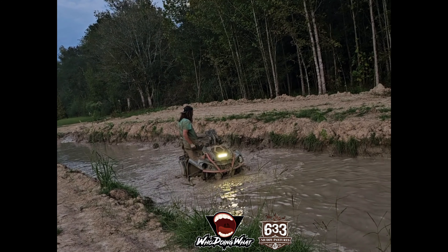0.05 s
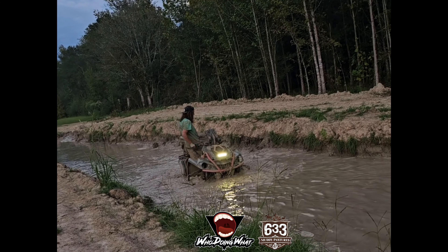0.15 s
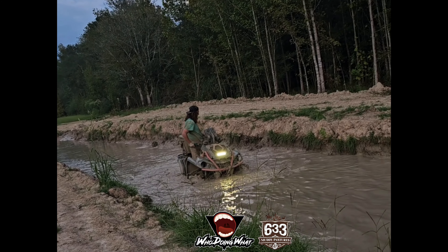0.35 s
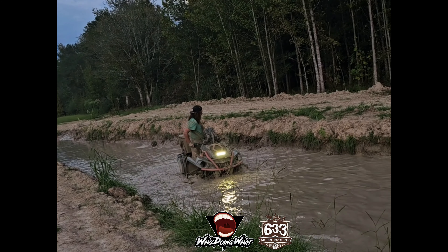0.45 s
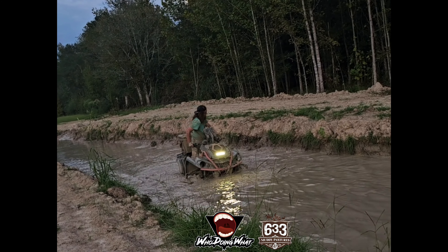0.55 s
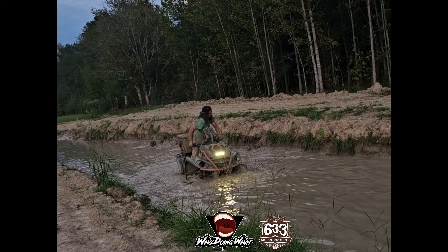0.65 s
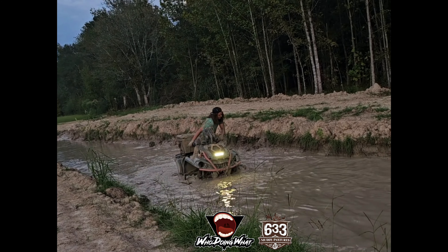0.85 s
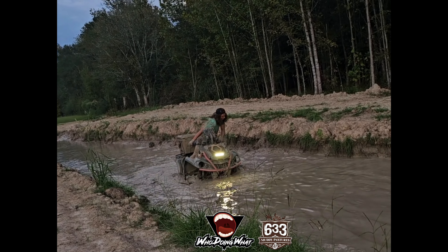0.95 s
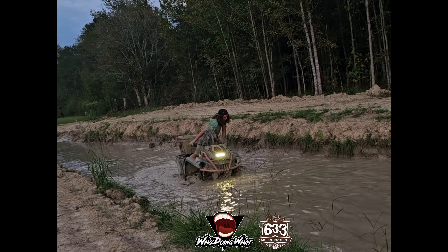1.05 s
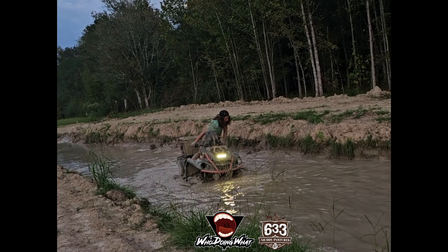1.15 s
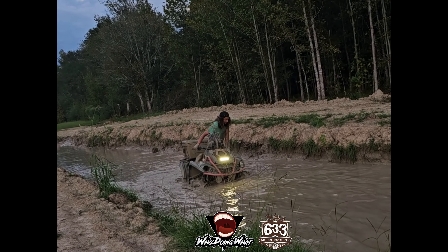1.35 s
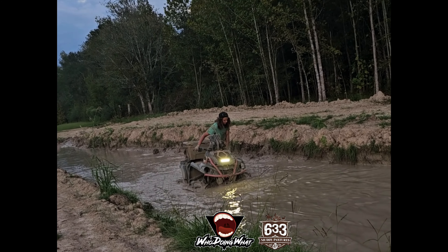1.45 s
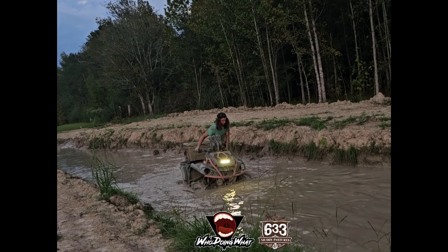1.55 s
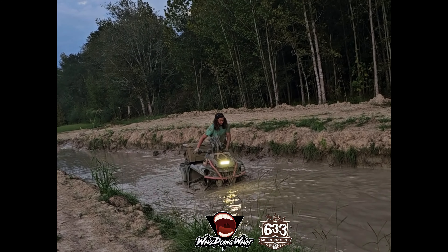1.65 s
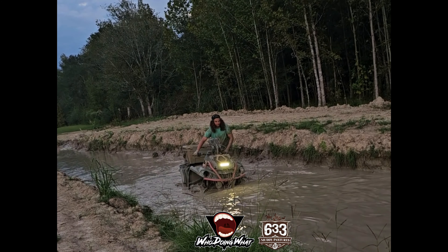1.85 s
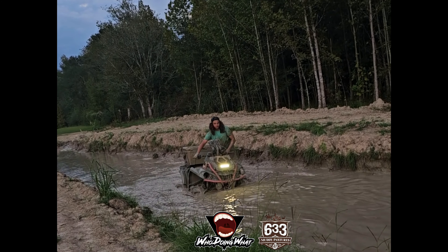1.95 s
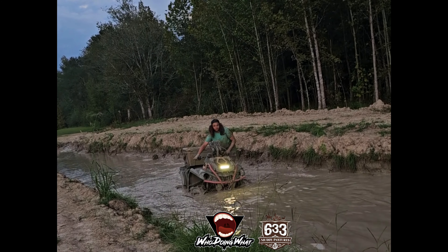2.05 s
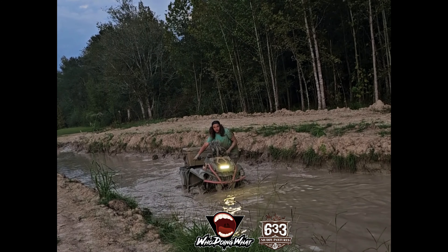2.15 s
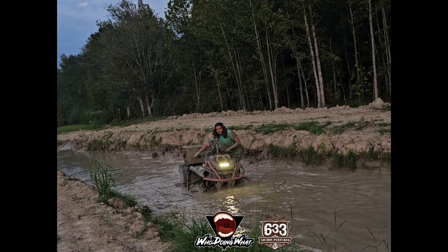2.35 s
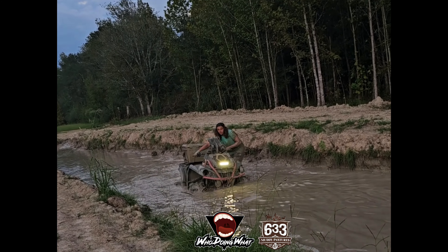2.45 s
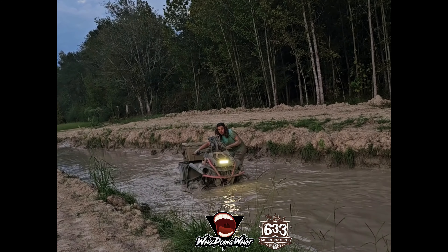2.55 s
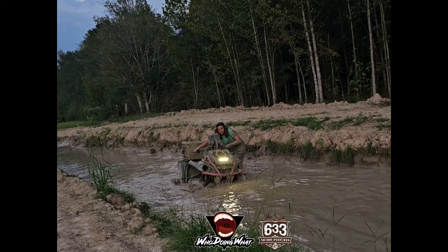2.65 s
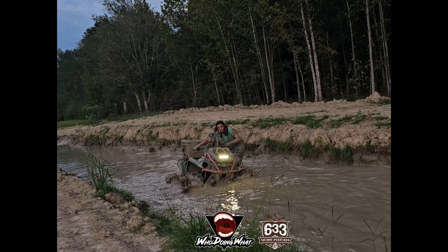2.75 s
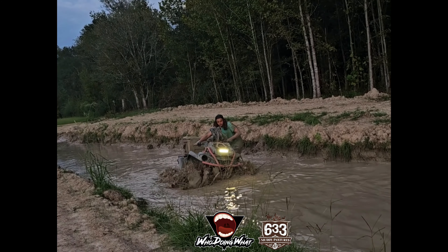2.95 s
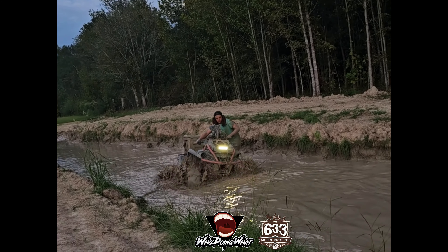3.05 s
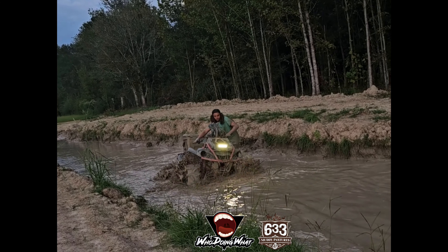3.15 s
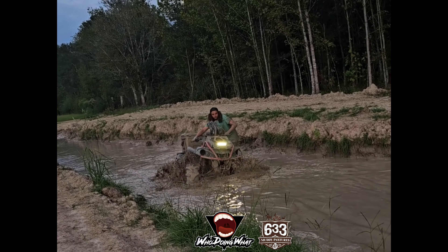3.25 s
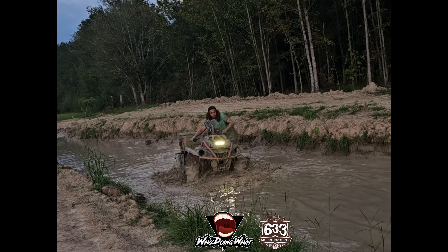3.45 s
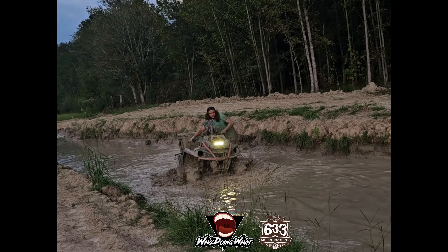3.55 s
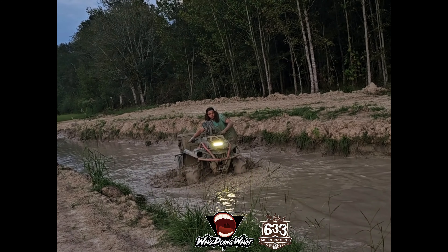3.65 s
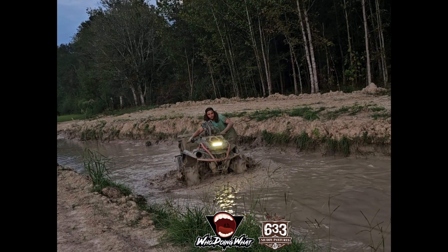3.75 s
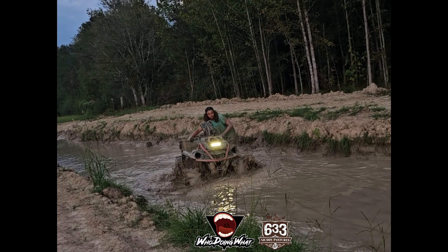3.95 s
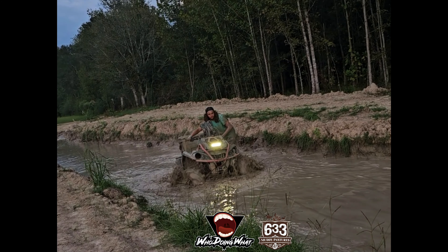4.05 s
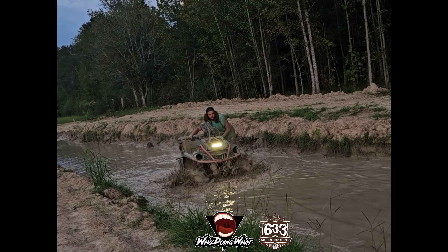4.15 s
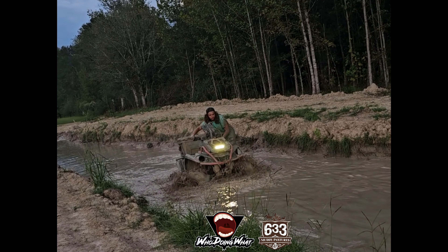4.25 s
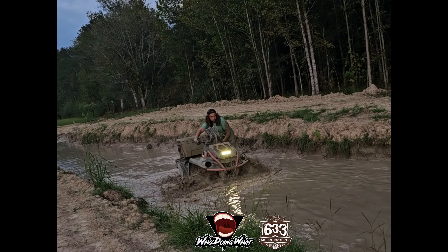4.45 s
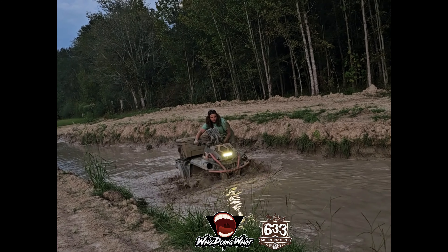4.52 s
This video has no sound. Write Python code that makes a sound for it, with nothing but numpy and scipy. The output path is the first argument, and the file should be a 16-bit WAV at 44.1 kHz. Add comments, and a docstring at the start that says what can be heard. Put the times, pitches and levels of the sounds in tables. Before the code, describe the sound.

Outdoors by a muddy pond, two small single-cylinder engines idle close to a stereo microphone, deep thumps drifting in and out of step with valve clatter. From two seconds a stuck quad on the left blips its throttle again and again, raspy and honking, its tyres throwing hissing spray and mud slaps. A distant engine drones from about four seconds.

```python
"""Two alike single-cylinder quads idle close by, drifting in and out of step, on the bank of a mud pond:
each firing rings the exhaust pipe and stirs valve clatter; a faint whirr lies on top.
Farther out a third quad is stuck in the water: its throttle is blipped, pulses and gas noise ring
its exhaust modes to a rasp, and the tyres throw spray, a gated hiss with slaps of mud.
A fourth engine drones in the distance, a gliding partial with some roar, over the rumble of far engines."""
import sys
import numpy as np
from scipy import signal
from scipy.fft import rfft, irfft
from scipy.io import wavfile
from scipy.ndimage import uniform_filter1d

SR = 44100
rng = np.random.default_rng(int(sys.argv[2]) if len(sys.argv) > 2 else 0)


def transcribe(u):
    """Save the signal u as a 16-bit wav file named by the first command-line argument.

    u: samples, shape (n,) or (channels, n), limited to [-1, 1]; the rate is SR.
    q: integer samples, one column per channel.
    """
    v = np.clip(np.atleast_2d(u).T, -1, 1)
    q = np.round(v * 32767).astype(np.int16)
    wavfile.write(sys.argv[1], SR, q)


N = 406602

# Throttle blips of the stuck quad. Each row: fully open at s, held for s, exhaust rasp in dB, spray in dB,
# pipe-mouth colour in dB, brightness in dB, honk in dB.
BLIPS = [(2.0, 0.17, -16, -38, -0.5, 2, 0.5), (2.875, .19, -14, -35, 0.5, 3.5, 1),
         (3.66, 0.22, -16, -41.5, 1, -4, -1), (4.16, .17, -20, -43.5, -4.5, -5.5, 8.5),
         (4.449, 0.198, -27, -53.5, -5.5, -6, 1), (4.76, .18, -16, -39, 2, -8, 4),
         (5.3, .08, -18, -43, -2, -5, -2.5), (5.7, .24, -19, -43, -0.5, -11, -1.5),
         (6.16, 0.2, -18, -38.5, -2.5, -1, 10.5), (6.68, .2, -22, -45.5, -3.5, -2.5, 1.5),
         (7.481, .04, -23, -42.5, -3, 5.5, -1.5), (7.801, 0.37, -27, -46.5, -0.5, 5, -0.5),
         (8.42, .14, -26, -43, -2, 8, 4), (8.93, 0.1368, -17, -41.5, 1, -1.5, -2),
         (9.101, 0.17, -17, -36.5, 0.5, 4.5, -3)]
SHUT_DB, OPEN_DB = -35, -15.5   # rasp levels taken as throttle shut and open


def from_db(db):
    """Gain of a level in dB."""
    return 10 ** (np.asarray(db) / 20)


def rms_one(x):
    """Scaled to rms 1, over all channels together."""
    return x / np.sqrt(np.mean(x ** 2) + 1e-20)


def in_time(rows):
    """Columns of a table whose first column is seconds, sample by sample."""
    s, *columns = np.transpose(rows)
    return [np.interp(np.arange(N) / SR, s, column) for column in columns]


def at_hz(points):
    """A table over frequency, read at every bin on a log axis."""
    hz = np.maximum(np.arange(N // 2 + 1) * SR / N, 1)
    points = np.array(points)
    return np.interp(np.log(hz), np.log(points[:, 0]), points[:, 1])


def colour(x, spectrum):
    """Gives a flat sound (one or two channels) a spectrum; rms 1."""
    return rms_one(irfft(rfft(x) * from_db(at_hz(spectrum)), N))


def drift(rate_hz):
    """Slow chance: lines between normal random knots of spread 1, two knots per cycle of the rate."""
    knots = rng.standard_normal(int(N / SR * rate_hz * 2) + 2)
    return np.interp(np.linspace(0, len(knots) - 1, N), np.arange(len(knots)), knots)


def fade(clicks, ms):
    """Each click becomes a step decaying with this time constant."""
    return signal.lfilter([1], [1, -np.exp(-1000 / (ms * SR))], clicks + 1e-18)


def ring(x, hz, t60_s):
    """A mode: each click starts a sine that falls 60 dB in t60."""
    r, w = from_db(-60 / (t60_s * SR)), 2 * np.pi * hz / SR
    return signal.lfilter([0, np.sin(w)], [1, -2 * r * np.cos(w), r * r], x)


def stereo(x, left_lag_ms, spread):
    """The left port is shifted by the lag (negative: it hears it early); a noise tail makes the ports unlike."""
    # Left-right likeness at full spread. Each row: Hz, likeness from 0 to 1.
    likeness = [(100, 0.99), (290, 0.94), (640, 0.069), (1400, 0.5)]
    alike = 1 - np.clip(spread * (1 - at_hz(likeness)), 0, 1)
    # scattered paths
    tail = rng.standard_normal(SR // 10) * np.exp(-np.arange(SR // 10) / (.025 * SR))
    direct = rfft(x)
    side = direct * rfft(tail / np.linalg.norm(tail), N) * np.sqrt((1 - alike) / 2)
    mid = direct * np.sqrt((1 + alike) / 2)
    shift = np.exp(-2j * np.pi * np.arange(N // 2 + 1) / N * left_lag_ms * SR / 1000)
    return np.sqrt(2) * irfft([(mid + side) * shift, mid - side], N) / np.sqrt(1 + alike.max())


def from_left(pair):
    """A source far to the left reaches the left port early and, in most bands, louder."""
    # Each row: Hz, lead of the left port in radians, excess of the left port in dB.
    left_lead = [(150, 0.22, 4.5), (480, 0.87, 3), (760, 2.43, 2), (910, 2.55, 9), (1460, 5.4, 14),
                 (1630, 5.7, 0), (1880, 7.77, -3), (3100, 7.8, 5), (5500, 13.1, 2.5)]
    lead_rad = at_hz([(row[0], row[1]) for row in left_lead])
    louder_db = at_hz([(row[0], row[2]) for row in left_lead])
    half = from_db(louder_db / 2) * np.exp(.5j * lead_rad)
    return irfft(rfft(pair) * [half, 1 / half], N)


def idle_firings():
    """One click per firing of either idling engine, in a buffer that starts half a second before the scene."""
    beat_s, puff_lead_ms, jitter_ms, spread_db = .06, 2.3, .45, 1
    # Each engine hunts about the steady beat: its firing time behind it. Each row: time in seconds, lag in ms.
    first_lag = [(0, -4.7), (.4, 2.2), (1.3, 5.8), (1.56, 8.8), (1.9, 17), (2.52, 18.3), (2.7, 20.2),
                 (3.42, 21.5), (4.68, 20.8), (4.86, 17.7), (5.24, 19), (6.1, 13.6), (6.3, 14.5),
                 (6.62, 11.1), (7.02, 12.4), (7.42, 11.3), (7.95, 22.7), (8.14, 33), (9.18, 126)]
    second_lag = [(0, 29.3), (.54, 26.9), (.9, 20.9), (1.44, 24.5), (1.8, 25), (1.98, 27.4), (2.7, 27.6),
                  (3.27, 26.3), (3.42, 24.5), (3.78, 23.7), (4.08, 13.9), (4.8, 14.3), (5.76, 16.8),
                  (5.96, 21.3), (6.3, 12), (6.84, 2.4), (7.03, 2.5), (7.2, 6.3), (7.52, 4), (7.76, 4.9),
                  (8.12, 2.7), (8.62, -8.8), (8.84, -7.3), (9.18, -11.1)]
    beats_s = np.arange(-4, N / SR / beat_s) * beat_s
    clicks = np.zeros(N + SR)
    for s, lag_ms in (np.transpose(first_lag), np.transpose(second_lag)):
        chance = rng.standard_normal((len(beats_s), 2))
        late_ms = np.interp(beats_s, s, lag_ms) - puff_lead_ms + jitter_ms * chance[:, 0]
        at_s = beats_s + late_ms / 1000
        np.add.at(clicks, np.round((at_s + .5) * SR).astype(int), from_db(spread_db * chance[:, 1]))
    return clicks


def idle_exhaust(clicks):
    """A soft gas puff rings the pipe modes, a sharp rap its wall; the bank throws back one echo."""
    puff_ms = .76
    bark_hz, bark_t60_s, bark_db, bark_spread_db = 554, .025, -29, 3
    echo_ms, echo_db = 19.3, -13.1
    # Exhaust pipe and silencer. Each row: Hz, signed strength, t60 in seconds.
    pipe_modes = [(55.6, -1.05, .109), (59.9, 1.58, .096), (80.5, -.69, .092), (121, -.13, .09),
                  (201, -.34, .043), (222, -.083, .28), (285, .48, .158), (338, .58, .07), (536, .35, .165)]
    puff = np.exp(-.5 * (np.arange(-200, 201) / (puff_ms * SR / 1000)) ** 2)
    puffs = np.convolve(clicks, puff / puff.sum(), "same") + 1e-18
    out = 0
    for hz, strength, t60_s in pipe_modes:
        out = out + strength * ring(puffs, hz, t60_s)
    # the valve snaps open and raps the pipe
    raps = clicks * from_db(bark_db + bark_spread_db * rng.standard_normal(len(clicks)))
    out = out - ring(raps + 1e-18, bark_hz, bark_t60_s)
    out = out + from_db(echo_db) * np.roll(out, round(echo_ms * SR / 1000))
    return out[SR // 2:SR // 2 + N]


def idle_clatter(clicks):
    """Mechanical noise that swells at each firing, with sharp valve ticks; partly its own at each port."""
    level_db = -30.5
    # Valve gear and air box. Each row: Hz, relative dB per Hz.
    clatter_spectrum = [(240, -34.5), (400, -3.5), (519, -5.5), (570, -15), (664, -13.5), (1000, -22.5),
                        (1480, -20), (2200, -30), (2570, -39.5), (3300, -37.5), (3850, -45), (4390, -38),
                        (8910, -57.5), (15700, -73)]
    clicks = clicks[SR // 2:SR // 2 + N]
    swells = fade(clicks, 22.0)
    ticks = fade(clicks * from_db(3.0 * drift(17)), 1.0)
    gate = .5 + .33 * swells + .99 * ticks
    shared = rng.standard_normal(N)
    noise = np.array([np.roll(shared, 15), shared])   # left port 15 samples late
    noise = noise + .76 * rng.standard_normal((2, N))
    return from_db(level_db) * colour(noise * gate * from_db(.19 * drift(8.8)), clatter_spectrum)


def whirr():
    """Faint noise of the idling pair in narrow resonances, wavering and fading, its own at each port."""
    fade_db_per_s = .6
    # Each row: centre in Hz, width in Hz, starting level in dB.
    whirr_bands = [(2890, 300, -63), (4430, 130, -64), (4970, 150, -64.5)]
    out = 0
    for hz, width_hz, level_db in whirr_bands:
        edges_hz = [hz - width_hz / 2, hz + width_hz / 2]
        band = signal.butter(2, edges_hz, "band", fs=SR, output="sos")
        gain = from_db(level_db - fade_db_per_s * np.arange(N) / SR + 2.0 * drift(11.0))
        out = out + gain * rms_one(signal.sosfilt(band, rng.standard_normal((2, N))))
    return out


def rumble():
    """Far engines merged into steady low noise."""
    level_db = -22.5
    # Each row: Hz, relative dB per Hz.
    rumble_spectrum = [(30, -5.5), (60, 15), (110, 9), (200, 9), (280, 12), (400, -24.5), (700, -67.5)]
    return from_db(level_db) * colour(rng.standard_normal(N), rumble_spectrum)


def throttle():
    """Levels of rasp and spray: each blip rises, is held and falls; powers add over the resting level."""
    # rasp is loudest as the throttle opens, spray as it shuts; slopes in dB per second
    rasp_rise, rasp_sag, rasp_fall, rasp_rest_db = 80, 15, 60, -36
    spray_rise, spray_build, spray_fall, spray_rest_db = 67, 16, 48.5, -51.5
    t = np.arange(N) / SR
    rasp_power, spray_power = from_db(rasp_rest_db) ** 2, from_db(spray_rest_db) ** 2
    for open_s, held_s, rasp_db, spray_db, *_ in BLIPS:
        before = np.maximum(open_s - t, 0)
        during = np.clip(t - open_s, 0, held_s)
        after = np.maximum(t - open_s - held_s, 0)
        rasp_now_db = rasp_db - rasp_rise * before - rasp_sag * during - rasp_fall * after
        to_shut = held_s - during
        spray_now_db = spray_db - spray_rise * before - spray_build * to_shut - spray_fall * after
        rasp_power = rasp_power + from_db(rasp_now_db) ** 2
        spray_power = spray_power + from_db(spray_now_db) ** 2
    return 10 * np.log10(rasp_power), 10 * np.log10(spray_power)


def throttle_opening(rasp_db):
    """Throttle opening read from the rasp level: 0 shut, 1 open."""
    return np.clip((rasp_db - SHUT_DB) / (OPEN_DB - SHUT_DB), 0, 1.2)


def quad_firings(rasp_db):
    """Uneven firings of the stuck quad, faster with the throttle."""
    slow_hz, fast_hz = 25.99, 44.99
    lagging = uniform_filter1d(np.roll(throttle_opening(rasp_db), SR // 14), SR // 5)   # the crank lags
    rate_hz = slow_hz + (fast_hz - slow_hz) * lagging
    cycles = np.cumsum(rate_hz * (1 + .01511 * drift(25))) / SR
    return np.diff(np.floor(cycles), prepend=0) * from_db(2.7 * drift(40))


def stuck_quad(firings, rasp_db):
    """Dull pulses and swelling bursts of turbulent gas ring exhaust modes that climb as the gas heats."""
    hot_rise, heat_lag_s, wander = .07, .15, .012   # rise and wander as shares of mode frequency
    mouth_rest_db = 1   # pipe-mouth colour before the first blip
    # Exhaust modes. Each row: Hz, width in Hz, relative dB, shares of the pipe-mouth colour,
    # of the brightness and of the honk.
    rasp_modes = [(248.2, 72, 13, -0.82, 0.051, -0.11), (472.3, 53, 7.5, -0.73, 0.022, 0.5),
                  (630, 108, 6.5, -0.067, 0, 0), (775.5, 135, 11, 0.66, 0.054, -0.04),
                  (1201, 210, 1, 0.2, 0.41, 0.8), (1500, 295, -0.5, 0.62, 0.6, 0.092),
                  (1953, 400, -11.5, -0.29, 1.4, 0.67), (2910, 700, -17.5, 0.16, 1.9, -1.1)]
    burst = rms_one(fade(fade(firings, 5.0), 7.0)) + .8
    # scattered paths make the ports a little unlike
    noise = rng.standard_normal(N) + .4 * rng.standard_normal((2, N))
    pulses = rms_one(fade(fade(firings, .59), .88))
    gas = .78 * pulses + rms_one(burst * noise)

    keep = np.exp(-1 / (heat_lag_s * SR))
    heat = signal.lfilter([1 - keep], [1, -keep], throttle_opening(rasp_db))
    # the pipe's own time runs faster when hot: filter in it, then return to real time
    clock = np.cumsum(1 + hot_rise * (heat - .5) + wander * drift(4.8))
    ticks = np.arange(int(clock[-1]) + 1)
    gas = np.array([np.interp(ticks, clock, port) for port in gas])

    # the mouth dips in the water, trading strength between modes
    colour_rows = [(.019, mouth_rest_db, .0092, 0)]
    colour_rows += [(open_s + held_s / 2, *rest[2:]) for open_s, held_s, *rest in BLIPS]
    colours_db = in_time(colour_rows)
    rasp = 0
    for k, (hz, width_hz, level_db, *shares) in enumerate(rasp_modes):
        r = np.exp(-np.pi * width_hz / SR)
        b = np.array([1, 0, -1]) * (1 - r * r) / 2
        a = [1, -2 * r * np.cos(2 * np.pi * hz / SR), r * r]
        once = signal.lfilter(b, a, gas)
        twice = signal.lfilter(b, a, once)
        mode_db = level_db + np.dot(shares, colours_db) + 2.2 * drift(5.1)
        gain = np.interp(ticks, clock, from_db(mode_db))
        rasp = rasp + (-1) ** k * gain * (twice + .45 * once)   # sharp top, wide skirt
    rasp = np.array([np.interp(clock, ticks, port) for port in rasp])
    return from_db(rasp_db) * rms_one(rasp)


def spray(firings, spray_db):
    """Slaps of mud of unequal size on a hiss that pulses with the firings; mostly its own at each port."""
    slaps_per_s = 40
    # Each row: Hz, relative dB per Hz.
    spray_spectrum = [(1120, -15), (1900, -6.5), (2350, -11.5), (3920, -11), (6330, -14), (7480, -15.5),
                      (8620, -38.5), (11300, -15.5), (12700, -16.5), (15700, -17.5)]
    sizes = from_db(5.1 * np.minimum(rng.exponential(1, N), 3))
    slaps = (rng.random(N) < slaps_per_s / SR) * sizes
    gate = 1.9 + 1.1 * fade(firings, 23.0) + .5 * fade(slaps, 6.5)
    noise = .5 * rng.standard_normal(N) + rng.standard_normal((2, N))
    wash = colour(noise * gate, spray_spectrum)
    # fine mist, the top of the spectrum, rises faster than the wash when the tyres spin
    mist = signal.sosfiltfilt(signal.butter(4, 7500, "high", fs=SR, output="sos"), wash)
    mist_gain = from_db(.35 * (spray_db + 29.5))
    return from_db(spray_db + .65 * drift(13)) * (wash + (mist_gain - 1) * mist)


def drone():
    """The strongest partial of a steadily driven engine, swelling in and out, and its broad roar."""
    roar_db = -44
    roar_band_hz = (850, 2350)   # Lower and upper edge in Hz.
    # One table per pass. Each row: time in seconds, strongest partial in Hz, its level in dB.
    drone_passes = [
        [(3.9, 200, -13.5), (4.3, 230, -15.5), (4.8, 226.8, -18), (5.2, 214, -23), (5.6, 204.6, -19),
         (6.1, 205.6, -18.5), (6.6, 191, -23.5)],
        [(7.1, 160.5, -35), (7.6, 171.9, -21.5), (8.1, 190.1, -23), (8.55, 177.5, -18.5), (8.9, 188, -23),
         (9.22, 190.4, -19)],
    ]
    t = np.arange(N) / SR
    out = np.zeros(N)
    for rows in drone_passes:
        hz, level_db = in_time(rows)
        swell_in = np.clip((t - rows[0][0]) / .42, 0, 1)
        swell_out = np.clip((rows[-1][0] + .47 - t) / .18, 0, 1)
        swell = swell_in * swell_out
        phase = 2 * np.pi * np.cumsum(hz * (1 + .008 * drift(14))) / SR
        out += swell * from_db(level_db + 2.2 * drift(9)) * np.sin(phase)
    band = signal.butter(4, roar_band_hz, "band", fs=SR, output="sos")
    roar = rms_one(signal.sosfilt(band, rng.standard_normal(N)))
    return out + swell * from_db(roar_db) * roar   # only the last pass roars


def scene():
    """The idling pair in front, the stuck quad and the drone off to the left."""
    clicks = idle_firings()
    exhaust = stereo(idle_exhaust(clicks), left_lag_ms=-.024, spread=.39)
    near = exhaust + idle_clatter(clicks) + whirr()
    rasp_db, spray_db = throttle()
    firings = quad_firings(rasp_db)
    stuck = from_left(stuck_quad(firings, rasp_db) + spray(firings, spray_db))
    far = stereo(drone() + rumble(), left_lag_ms=-.18, spread=.27)
    return near + stuck + far


def record(dry):
    """Peaks are rounded; the right port is shaded in the treble, a narrow notch dulls it, the top is cut."""
    notch_hz, notch_width_hz, notch_db = 8800, 240, -27.5   # a narrow notch dulls the treble near 8.8 kHz
    cutoff_hz = 15830
    # Each row: Hz, left port over right port in dB.
    right_shade = [(250, 0.27), (400, -3), (640, 1), (1000, 1), (1450, -10.5), (2100, 1.5), (3100, -0.5),
                   (4300, 7.5), (6820, 13.5), (15000, 7.5)]
    wet = dry / (1 + np.abs(dry / 1.02) ** 8) ** (1 / 8)
    shade = from_db(np.outer([.5, -.5], at_hz(right_shade)))
    shade = shade / np.sqrt(np.mean(shade ** 2, axis=0))   # keeps the mean power gain of the two ports at 1
    hz = np.arange(N // 2 + 1) * SR / N
    notch = from_db(notch_db * np.exp(-.5 * ((hz - notch_hz) / notch_width_hz) ** 2))
    wet = irfft(rfft(wet) * notch * shade, N)
    return signal.sosfilt(signal.ellip(12, .5, 70, cutoff_hz, fs=SR, output="sos"), wet)


dry = scene()
out = record(dry)
transcribe(out)
```